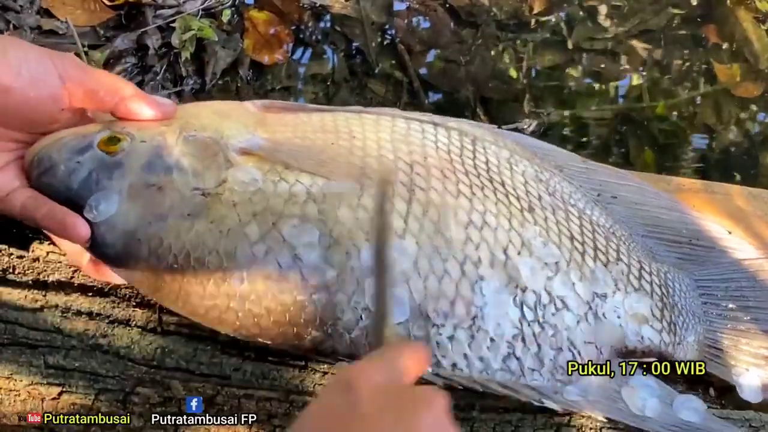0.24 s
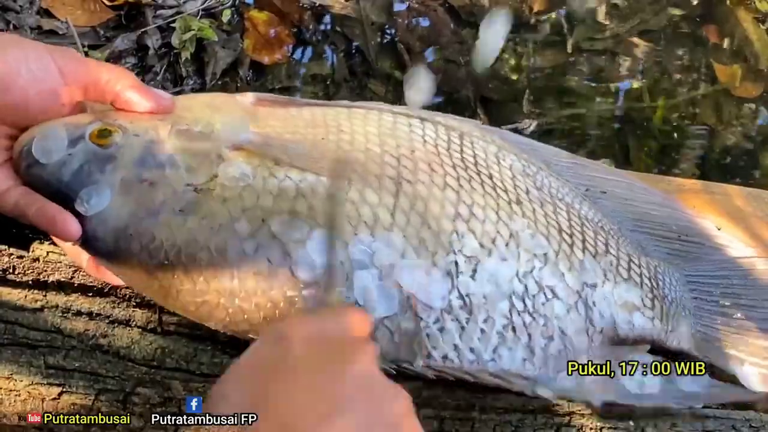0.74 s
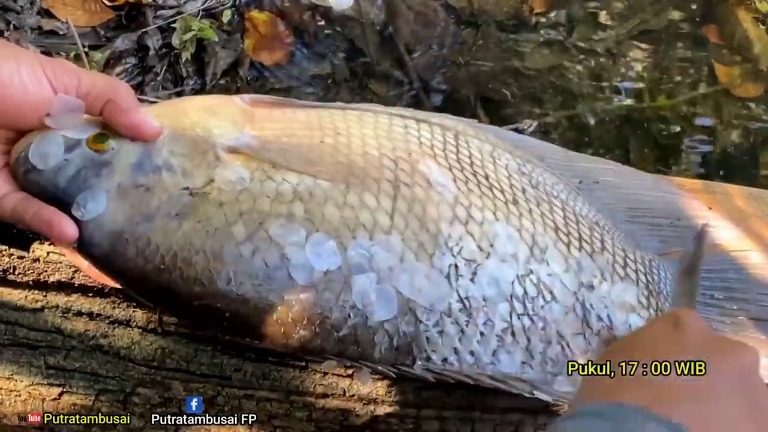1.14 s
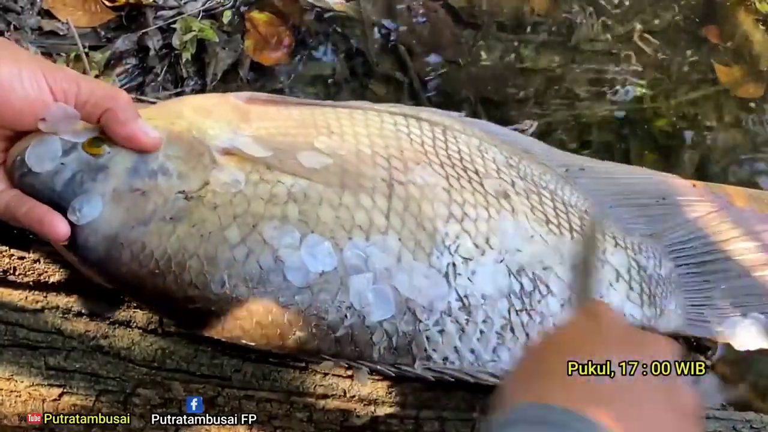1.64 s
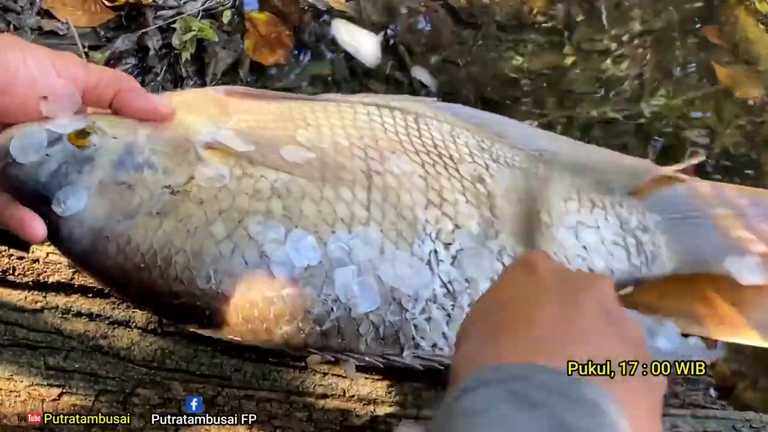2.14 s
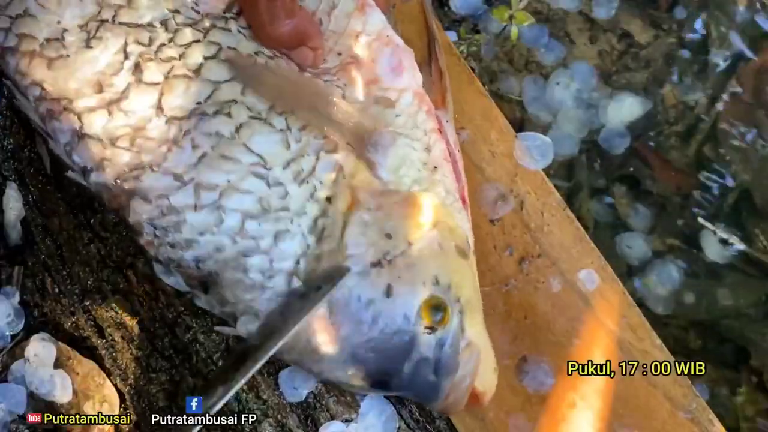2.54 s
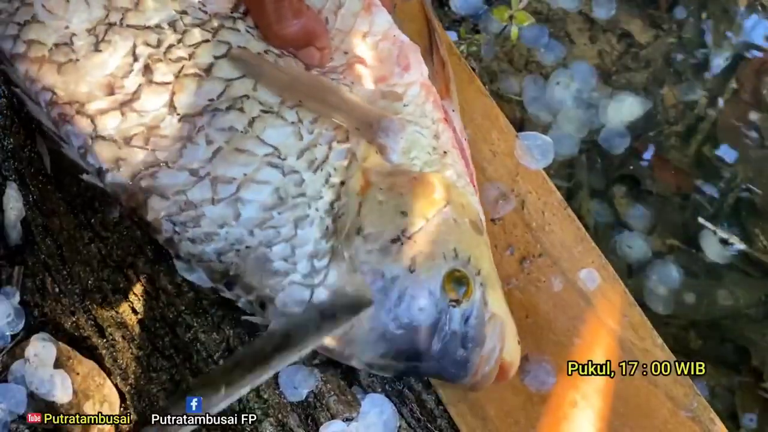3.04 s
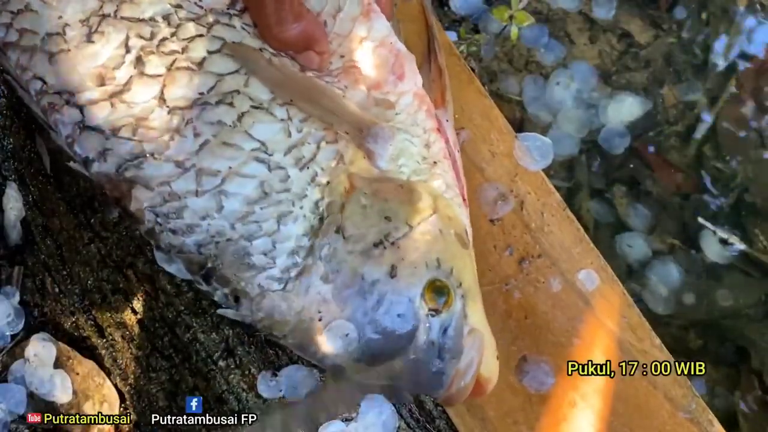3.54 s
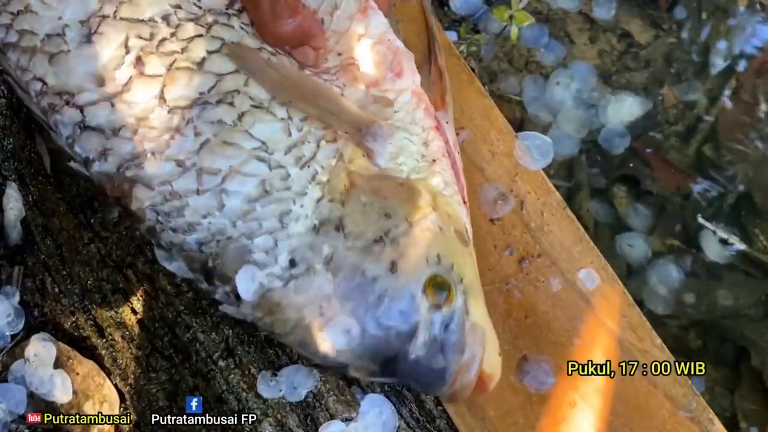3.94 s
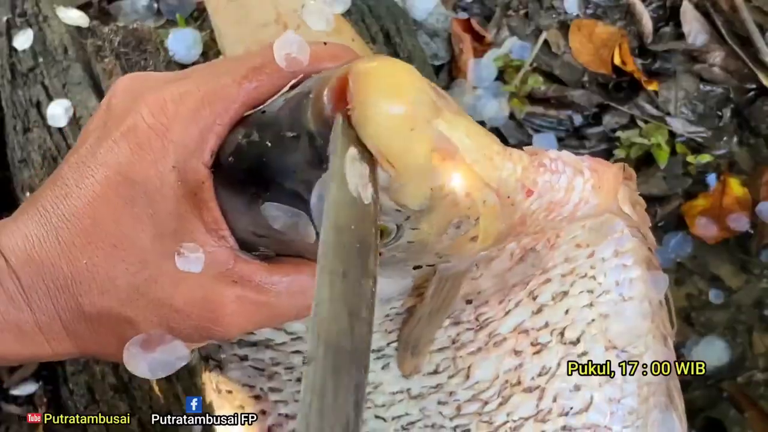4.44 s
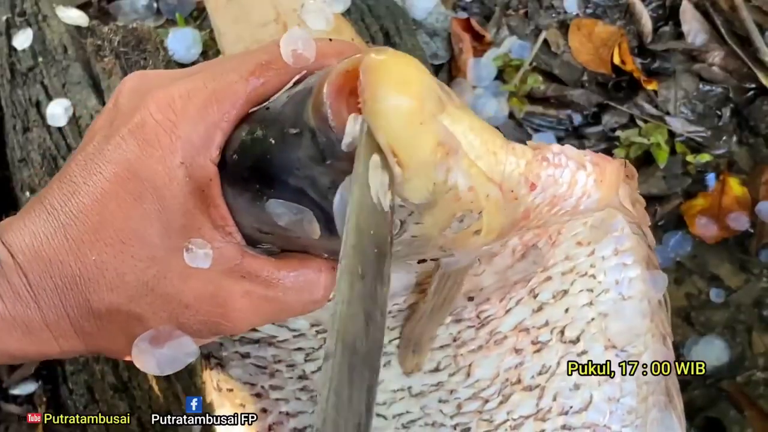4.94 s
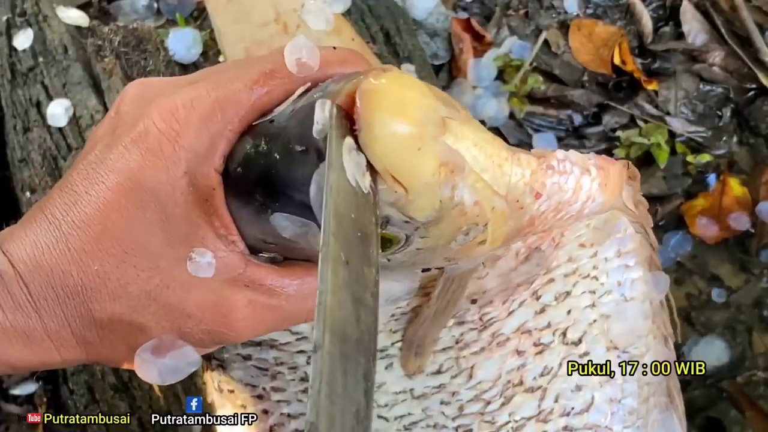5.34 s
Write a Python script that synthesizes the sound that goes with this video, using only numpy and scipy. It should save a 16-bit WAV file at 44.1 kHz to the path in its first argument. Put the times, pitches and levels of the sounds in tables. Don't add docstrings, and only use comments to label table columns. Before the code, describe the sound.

A knife rasps scales off a large fish in quick crackling strokes, ending on the bony head, beside a low rumbling river with insects.

```python
import sys
import numpy as np
from scipy import signal
from scipy.fft import rfft, irfft
from scipy.io import wavfile
from scipy.ndimage import uniform_filter1d

SR = 44100
rng = np.random.default_rng(int(sys.argv[2]) if len(sys.argv) > 2 else 0)


def to_wav(sig):
    pcm = np.clip(np.atleast_2d(sig), -1, 1) * 32767
    pcm = np.round(pcm).astype(np.int16)
    wavfile.write(sys.argv[1], SR, pcm.T)


def volts_from_db(level):
    exponent = np.asarray(level, float) / 20
    return 10 ** exponent


N = 246519


def level(x, db):
    return x * volts_from_db(db) / np.sqrt(np.mean(x ** 2))


def band(x, lo_hz, hi_hz, order=2):
    edges = [lo_hz, min(hi_hz, .45 * SR)]
    return signal.sosfilt(signal.butter(order, edges, "bandpass", fs=SR, output="sos"), x)


def colour(x, points):
    hz, db = np.transpose(points)
    log_f = np.log(np.fft.rfftfreq(N, 1 / SR) + 1)
    return irfft(rfft(x) * volts_from_db(np.interp(log_f, np.log(hz), db)), N)


def walk(rate):
    hold = int(SR / rate)
    steps = np.repeat(rng.standard_normal(N // hold + 1), hold)
    return 1.3 * uniform_filter1d(uniform_filter1d(steps, hold), hold)[:N]


def curves(tables, edge_s):
    t, out = np.arange(N) / SR, np.zeros((len(tables[0][0]), N))
    for table in tables:
        s, *columns = np.transpose(table)
        on = (t >= s[0]) & (t < s[-1])
        fade_in = (t[on] - s[0]) / edge_s[0]
        fade_out = (s[-1] - t[on]) / edge_s[1]
        out[0, on] = np.clip(np.minimum(fade_in, fade_out), 0, 1)
        out[1:, on] = [np.interp(t[on], s, c) for c in columns]
    return out


def add(out, s, sound):
    i = int(s * SR)
    out[i:i + len(sound)] += sound[:N - i]


def squelch(knife):
    depth_db, time_s = -10.5, 0.11
    n = np.arange(N)
    last_loud = np.maximum.accumulate(n * (np.abs(knife) > volts_from_db(-42)))
    since_s = (n - last_loud) / SR
    return volts_from_db(uniform_filter1d(depth_db * (1 - np.exp(-(since_s / time_s) ** 2)), size=400))


# (frequency [Hz], density [dB per Hz])
RIVER_SPECTRUM = [(25, -46.5), (50, -5), (100, -8.5), (240, -12.5), (400, -25.5), (1300, -40.5),
                  (2200, -37), (6000, -39.5), (11000, -38.5), (15200, -42.5), (16000, -64)]
# (time [s], level [dB])
WATER_HISS = [(0, 5), (2.5, -1), (2.75, 7.5), (3.25, 4), (3.45, 1), (3.9, 2.5), (4.601, 5.5)]
# (time [s], level [dB])
INSECT_SWELL = [(0, -68.5), (2.199, -65.5), (4.2, -62), (4.4, -57), (5.59, -56)]


def riverside(let_through):
    t = np.arange(N) / SR
    water = colour(rng.standard_normal(N), RIVER_SPECTRUM)
    rumble = band(water, 20, 450, order=1) * np.sqrt(let_through)
    rumble = rumble * volts_from_db(3 * walk(12) + 1.2 * walk(3))
    wash_db = 4 + 1.2 * walk(2.8) + np.interp(t, *np.transpose(WATER_HISS))
    wash = band(water, 490, 16500, order=1) * let_through * volts_from_db(wash_db)
    insects = level(band(rng.standard_normal(N), 7880, 9500, order=3), -1.4) * volts_from_db(1.2 * walk(27))
    return level(rumble + wash, -54.5) + insects * volts_from_db(np.interp(t, *np.transpose(INSECT_SWELL)))


# (time [s], pitch [Hz], level [dB])
BIRD_WHISTLES = [
    [(.952, 4000, -58), (.975, 4300, -52), (.992, 4600, -54), (1.005, 5050, -52), (1.03, 5150, -53)],
    [(1.41, 5400, -58), (1.455, 5250, -59), (1.475, 4450, -58), (1.5, 4330, -53), (1.52, 4380, -64),
     (1.545, 4400, -62), (1.575, 4420, -70)],
    [(2.803, 1600, -53), (2.82, 2050, -54), (2.855, 2400, -52)],
    [(2.6, 5400, -64), (2.625, 5200, -62)],
    [(2.935, 1750, -66), (2.95, 1950, -62), (2.965, 2150, -58), (2.975, 1800, -64), (3.0, 1650, -58)],
    [(3.025, 3100, -66), (3.05, 3200, -63)],
    [(3.21, 2000, -66), (3.235, 1900, -66)],
    [(4.61, 4600, -68), (4.65, 4600, -70)],
    [(4.74, 3500, -72), (4.765, 3300, -72)],
    [(4.77, 2710, -70), (4.86, 2740, -59), (4.915, 2800, -55), (4.935, 2900, -62), (4.96, 2800, -66),
     (5.025, 2850, -68)],
    [(5.027, 2800, -61), (5.04, 2250, -63), (5.055, 1950, -67), (5.1, 1800, -73)],
]


def birds():
    on, hz, db = curves(BIRD_WHISTLES, (.01, .015))
    tremble = 1 + .004 * walk(90) + .008 * walk(400)
    phase = 2 * np.pi * np.cumsum(hz * tremble) / SR
    tone = np.sin(phase) * np.sqrt(2) * on * volts_from_db(db + 2.5 * walk(90))
    t = np.arange(6000) / SR
    trees = rng.standard_normal(len(t)) * np.exp(-np.log(1000) * t / .25)
    return volts_from_db(-4) * tone + volts_from_db(-37) * signal.fftconvolve(tone, trees)[:N]


# (frequency [Hz], rms level [dB])
WING_HARMONICS = [(590, -70), (890, -83), (1175, -81), (1490, -77), (1790, -78)]
# (time [s], level [dB])
FLY_PASSAGE = [
    (0, 2),
    (.45, 3),
    (.75, 2.5),
    (1.1, -11.5),
    (1.9, -50),
]


def fly():
    t = np.arange(N) / SR
    clock = np.cumsum(1 + .008 * walk(10) + .032 * walk(200)) / SR
    hum = sum(volts_from_db(db + 4.5 * walk(30)) * np.sin(2 * np.pi * hz * clock) for hz, db in WING_HARMONICS)
    return np.sqrt(2) * hum * volts_from_db(np.interp(t, *np.transpose(FLY_PASSAGE)))


# (time [s], peak level [dB], pitch [Hz])
FLESH_THUDS = [(.2, -31.5, 201), (.274, -32.5, 459), (.49, -32, 146), (.62, -36.5, 336), (.784, -13, 1845),
               (.83, -30.5, 197), (1.024, -22.5, 198), (1.091, -29.5, 262), (1.162, -35, 840),
               (1.306, -25.5, 220), (1.325, -24.5, 230), (1.338, -27, 215), (1.396, -26.5, 260),
               (1.377, -22.5, 233), (1.578, -9.5, 500), (1.666, -22, 266), (1.874, -26.5, 263),
               (1.964, -22, 240), (2.168, -19.5, 308), (2.275, -25, 193), (2.402, -24, 538),
               (2.444, -23, 419), (2.858, -26.5, 544), (3.072, -20, 528), (3.106, -18.5, 965),
               (3.3, -20.5, 606), (3.339, -17, 1016), (3.372, -31.5, 248), (3.557, -22, 516),
               (3.599, -16, 382), (3.815, -31, 360), (.876, -42, 810), (2.315, -31.5, 254),
               (2.832, -43, 300), (1.685, -26, 240), (2.196, -30, 300), (1.6, -28, 330), (1.045, -28, 200)]


def thuds():
    out, t = np.zeros(N), np.arange(4000) / SR
    for s, db, hz in FLESH_THUDS:
        noise = rng.standard_normal(len(t))
        sink = .75 + 1.9 * min(hz / 500, 1) ** 1.5 * np.exp(-t / .003)
        pitch = hz * sink * (1 + .8 * uniform_filter1d(noise, size=120))
        wave = np.sin(2 * np.pi * np.cumsum(pitch) / SR) + 2.8 * band(noise, hz / 2, hz * 1.8)
        t60_s = 0.045 * (400 / hz) ** 0.4
        shape = (1 - np.exp(-t / .0012)) * np.exp(-np.log(1000) * t / t60_s)
        add(out, s + .002, volts_from_db(db) * wave * shape)
    return out


# (time [s], peak level [dB], lowest mode [Hz])
BONE_KNOCKS = [(2.63, -29, 644), (2.665, -36, 1170), (3.415, -47, 850), (3.75, -33.5, 550),
               (3.794, -24.5, 510), (4.018, -27, 557), (4.034, -23.5, 589), (4.049, -25, 556),
               (4.259, -18, 525), (4.275, -14, 540), (4.479, -26, 525), (4.494, -21, 917),
               (4.5, -16.5, 610), (4.69, -36.5, 444), (4.826, -49, 1804), (4.843, -43, 1780),
               (4.974, -38, 1776)]
# (multiple of the lowest [ratio], level [dB])
SKULL_MODES = [(1, 5), (1.7, -4.5), (2.3, -7), (3.6, -9)]


def knocks():
    t60_s, rise_s = 0.029, 0.0019
    out, t = np.zeros(N), np.arange(3000) / SR
    shape = (1 - np.exp(-(t / rise_s) ** 2)) * np.exp(-np.log(1000) * t / t60_s)
    for s, db, hz in BONE_KNOCKS:
        noise = rng.standard_normal(len(t))
        modes = np.zeros(len(t))
        for k, (multiple, mode_db) in enumerate(SKULL_MODES):
            phase = 2 * np.pi * hz * multiple * t + 3 * noise[k + 8]
            modes += volts_from_db(mode_db + 2 * noise[k]) * np.sin(phase)
        push = band(noise, hz * 0.84, hz * 2.96)
        add(out, s, volts_from_db(db) * shape * (0.93 * modes + 1.77 * push))
    return out


# (landing [s], lifting [s], drag on landing [dB], drag on lifting [dB], flesh re rasp [dB])
KNIFE_STROKES = [(0, 0.133, -36.5, -55, -10), (0.193, 0.392, -33, -58, -19),
                 (0.474, 0.662, -48, -44.5, -17.5), (0.759, 0.97, -38, -55.5, -11.5),
                 (1.021, 1.224, -34, -73, -15), (1.3, 1.483, -44, -60, -14),
                 (1.576, 1.791, -28.5, -56.5, -14), (1.868, 2.09, -31, -49.5, -16.5),
                 (2.163, 2.385, -31.5, -50, -12.5), (2.396, 2.586, -25.5, -48, -16.5),
                 (2.62, 2.817, -48.5, -60, -15), (2.844, 3.019, -34.5, -57, -13),
                 (3.03, 3.247, -56, -43.5, -13.5), (3.291, 3.406, -39, -65, -13.5),
                 (3.527, 3.644, -39.5, -68, -5), (3.75, 3.86, -39.5, -75, -11),
                 (3.997, 4.108, -49.5, -70, -8), (4.241, 4.312, -49.5, -65.5, -12),
                 (4.465, 4.619, -49.5, -75, -12), (4.684, 4.743, -44.5, -57, -18.5),
                 (5.284, 5.426, -38, -53.5, -28), (5.517, 5.571, -50.5, -34, -28)]
# (time [s], peak level [dB], build-up per 20 dB [ms], release per 20 dB [ms])
SCALE_CATCHES = [(0.254, -22, 30, 19), (.319, -40.5, 44, 21), (0.533, -25.5, 43, 47), (0.787, -28, 54, 15),
                 (.834, -32.5, 15, 15), (1.07, -31.5, 67, 58), (1.1, -29.5, 79, 25), (1.16, -46.5, 75, 45),
                 (1.331, -25.5, 29, 46), (1.385, -31.5, 36, 58), (1.674, -27.5, 104, 26),
                 (1.914, -25.5, 15, 13.6), (1.977, -20, 16, 19), (2.213, -19, 18, 14), (2.277, -26, 13, 33),
                 (2.631, -20, 2.9, 45.5), (2.749, -33.5, 76, 24), (2.861, -26.5, 49, 28),
                 (2.991, -47.5, 33, 28), (3.073, -20, 14.3, 18.5), (3.113, -17.5, 24.5, 14.7),
                 (3.318, -20, 21, 22), (3.565, -32, 18, 40), (3.797, -22, 4.3, 33), (4.05, -28, 43, 20),
                 (4.265, -20, 12.8, 26.5), (4.501, -25, 50, 16.5), (4.721, -32, 65, 14),
                 (5.345, -27.5, 84, 25), (5.402, -40, 54, 15)]


def pressure():
    t = np.arange(N) / SR
    strokes = [[(a, d0, f), (b, d1, f)] for a, b, d0, d1, f in KNIFE_STROKES]
    on, drag_db, flesh_db = curves(strokes, (0.004, 0.03))
    gain = volts_from_db(drag_db)
    for s, db, build_ms, release_ms in SCALE_CATCHES:
        i = slice(max(int((s - .3) * SR), 0), int((s + .3) * SR))
        slope_ms = np.where(t[i] < s, build_ms, release_ms)
        gain[i] += volts_from_db(db - 20 * 1000 * np.abs(t[i] - s) / slope_ms)
    return on * gain, on * gain * volts_from_db(flesh_db)


# (frequency [Hz], density [dB per Hz])
RASP_SPECTRUM = [(600, -8), (1100, 3), (2000, 12.5), (4400, 18.5), (7500, 18.5), (9000, 14), (11000, 9.5),
                 (14000, 12.5), (15800, -5.5), (16500, -49.5)]


def rasp(gain, push):
    slip_db = 1.1 * np.minimum(rng.exponential(size=N), 5)
    slips = (rng.random(N) < .25) * rng.standard_normal(N) * volts_from_db(slip_db)
    scales = level(colour(slips, RASP_SPECTRUM), -0.44)
    dull = band(scales, 630, 4400) * volts_from_db(3.28 * walk(200))
    bright = band(scales, 7100, 16500) * volts_from_db(3.73 * walk(200))
    middle = band(scales, 4730, 6860) * volts_from_db(-2 + 3.8 * walk(150))
    edge = gain * volts_from_db(2 * walk(60)) * (dull + middle + bright)
    flesh = level(band(slips, 210, 1150), -1.27) * volts_from_db(4 * walk(40.09)) * push
    sway = signal.lfilter([1 / 900], [1, 1 / 900 - 1], push)
    rocking = level(band(rng.standard_normal(N), 36, 182), 0.2) * sway
    return edge, flesh + rocking


def small_scales(gain, count=200):
    when, size, pitch = rng.random((count, 3)).T
    when = .01 + when * (N / SR - .05)
    press_db = 20 * np.log10(gain[(when * SR).astype(int)] + 1e-6)
    db = press_db + 3 - 2 * np.log(size + 0.033)
    hz = 5600 * 2 ** (1.1 * (pitch - .5))
    return [(s, d, f, 0.66) for s, d, f in zip(when, db, hz) if d > -60]


# (time [s], peak level [dB], pitch [Hz], length [ms])
SCALE_SNAPS = [(.072, -21.5, 2250, 1.8), (.236, -23, 6800, 0.38), (.2512, -1.5, 6200, 0.55),
               (.2747, -17.5, 2670, 2.3), (.3169, -11, 4180, 1.66), (.5062, -14.5, 4630, 0.18),
               (.5623, -16, 5530, 1.2), (.7655, -19, 8860, 1.6), (.7869, -0.5, 8140, 0.13),
               (.8323, -8, 2670, 0.54), (.9537, -20, 9800, 0.67), (1.0458, -9.5, 5300, 1.7),
               (1.0533, -10.5, 4380, 0.49), (1.08, -14, 8500, 0.85), (1.0955, -1, 3310, .9),
               (1.1509, -16.5, 2920, 1.5), (1.1627, -13, 4300, 1.5), (1.332, -14, 9200, 0.46),
               (1.3809, -3.5, 3500, 1.5), (1.3955, -12, 10100, 1.2), (1.63, -13, 8960, 1.3),
               (1.6736, -18, 3500, 0.45), (1.679, -11, 5130, 1.5), (1.709, -20.5, 3300, 0.73),
               (1.9675, 1, 3100, 0.67), (1.9707, 1.5, 4270, 0.35), (1.9816, -10.5, 3830, 1.2),
               (2.215, -12, 5660, 1.2), (2.276, -9, 8600, 0.41), (2.3176, -24, 1980, 7.3),
               (2.3982, -15.5, 9600, 1.3), (2.4034, -13.5, 3530, 1.5), (2.454, -16, 6470, 0.39),
               (2.5441, -18.5, 4020, 0.28), (2.631, -15, 7000, 0.47), (2.6343, -8, 4020, 0.31),
               (2.7433, -9, 4150, 0.22), (2.857, -9.5, 11200, 1.3), (2.9655, -24.5, 3880, 1.34),
               (3.0787, -17, 2120, 2.9), (3.1047, -8.5, 9000, 1.8), (3.1099, -7, 7200, 3.7),
               (3.3033, 0, 5330, 0.65), (3.3154, -22.5, 4430, 2.8), (3.3185, -3.5, 4580, 0.56),
               (3.3412, -1.5, 4080, 1.9), (3.441, -35.5, 9470, 1.7), (3.4574, -37, 6060, 1.2),
               (3.5593, -10.5, 6840, 1.8), (3.5632, -7.5, 7500, 2.6), (3.5737, -4, 3960, 0.96),
               (3.753, -31, 4500, .74), (3.7964, -14.5, 3180, 0.61), (3.8154, -5, 8750, 1.2),
               (4.0389, -7, 6600, 0.2), (4.054, -8.5, 7870, 2.7),
               (4.2595, -15, 5600, 0.53), (4.3995, -32, 11150, 1.8), (4.4623, -23.5, 11100, 0.76),
               (4.477, -19, 8050, 0.67), (4.496, -0.5, 10100, 0.89), (4.5459, -18.5, 9200, 0.89),
               (4.561, -9.5, 9240, 0.34), (4.5648, -13.5, 9300, 1.7), (4.699, -19, 9600, 0.59),
               (4.8282, -25.5, 10030, 0.84), (4.8437, -19.5, 11800, 1.5), (4.8601, -32, 7500, 0.42),
               (4.975, -21, 9900, 1.45), (5.098, -38.5, 4460, 1.13), (5.1267, -16, 9100, 0.66),
               (5.1322, -22, 8700, 1.4), (5.2775, -31, 10900, 1.6), (5.308, -14, 11100, 3.1),
               (5.325, -15, 11000, 1.4), (5.343, -12.5, 10500, 6.9), (5.3467, -8, 6000, 3),
               (5.4232, -22.5, 11900, 1.3), (5.5064, -34, 8700, .76), (5.524, -22.5, 12100, 1.4),
               (5.5439, -8, 11700, 0.18), (5.553, -10, 9500, 0.39), (5.5673, -29, 9000, 1.2),
               (.2095, -21.5, 4190, 2.3), (.4325, -46, 4570, .6), (0.4819, -29, 7270, 1),
               (0.519, -15.5, 4380, 2), (0.538, -19.5, 3500, 2.2), (.58, -30, 2500, 1),
               (.597, -33, 4500, 1), (.6138, -30, 4960, .8), (.634, -27.5, 5000, 2.6),
               (.658, -44, 4500, .7), (0.8155, -23, 4310, 1), (.895, -41, 3500, 1),
               (1.0306, -22, 4480, 1.1), (1.3218, -16.5, 4930, 1.2), (1.341, -23.5, 2500, 1),
               (1.667, -19.5, 1750, 1.2), (1.762, -37.5, 2210, 2), (1.777, -33, 5150, 1),
               (1.8414, -46.5, 10500, .6), (1.894, -21, 10200, 1.1), (2.077, -39, 1500, 1.1),
               (2.1265, -46, 7860, .6), (2.2002, -15.5, 10730, 1.1), (2.432, -23, 2000, 2),
               (2.7262, -22, 4600, 2), (2.732, -25, 2500, .5), (2.898, -28, 2000, 0.91),
               (2.9255, -34, 3480, .8), (2.99, -33, 5690, 2), (3.3442, -1.5, 4130, 0.44),
               (3.056, -24.5, 7720, 0.91), (3.2, -33.5, 4300, 3), (3.2454, -41.5, 5270, 0.78),
               (3.415, -44, 2010, 1), (3.484, -53, 3800, 1), (3.634, -30.5, 6030, 1),
               (3.678, -43, 1820, 1.5), (3.71, -50, 6000, 0.87), (3.768, -37, 3500, 1.1),
               (4.0168, -22, 4200, 1.1), (4.0341, -13, 7520, 0.83), (4.192, -52.5, 2280, .8),
               (4.2647, -13, 4540, 1), (4.795, -51, 5000, 1.1), (4.687, -34, 2700, 1),
               (5.227, -53, 3000, 1), (5.291, -27.5, 3430, 2), (5.358, -14, 4760, 2)]


def snaps(gain):
    rows = SCALE_SNAPS + small_scales(gain)
    out, t = np.zeros(N), np.arange(-300, 1200) / SR
    chance = rng.standard_normal((300, len(t)))
    for (s, db, hz, ms), noise in zip(rows, chance):
        crackle = noise * np.exp(np.where(t < 0, t / 0.59, -t / 1.43) / (ms / 1000))
        crack = np.sin(2 * np.pi * hz * t + 3 * noise[0]) * np.exp(-(t * hz / 1.42) ** 2)
        broad = band(crackle, 1700, 13000, order=1)
        ring = band(crackle, hz / 1.51, hz * 1.307, order=1)
        sound = volts_from_db(-3.5) * broad / np.abs(broad).max()
        sound = sound + volts_from_db(3) * ring / np.abs(ring).max() + volts_from_db(3) * crack
        add(out, s + t[0], sound * volts_from_db(db) / np.abs(sound).max())
    return out


# (frequency [Hz], width [Hz], level [dB])
BLADE_MODES = [(1860, 69, -5.5), (2670, 140, -7), (3500, 47, -3), (4380, 66, -8.5), (5420, 110, -9.5),
               (6990, 88, -3), (7810, 77, -6), (8480, 65, 2), (9300, 110, 0), (10610, 160, -0.5),
               (11800, 170, -1)]


def blade(x):
    ring = np.zeros(N)
    for hz, w, db in BLADE_MODES:
        ring += volts_from_db(db) * band(x, hz - w - 30, hz + w + 30, order=1) * np.sqrt(500 / w)
    on_bone = np.arange(N) / SR > 4.65
    return np.where(on_bone, volts_from_db(-5) * band(x, 1900, 16500) + volts_from_db(-1) * ring, x)


# (frequency [Hz], lead of the left [rad])
CHANNEL_PHASE = [(20, 0), (2300, 0), (3100, .6), (5200, .45), (5900, -.55), (6700, 0), (7800, 0), (8100, 2.1),
                 (9000, 2), (10500, .1), (11200, -.1), (13500, -3.14), (15500, -6.2)]


def spread_stereo(x):
    hz, lead = np.transpose(CHANNEL_PHASE)
    turn = np.exp(.5j * np.interp(np.fft.rfftfreq(N, 1 / SR), hz, lead))
    return np.array([irfft(rfft(x) * turn, N), irfft(rfft(x) / turn, N)])


def scene():
    gain, push = pressure()
    edge, flesh = rasp(gain, push)
    scales = snaps(gain)
    knife = blade(edge + scales) + flesh + thuds() + knocks()
    t = np.arange(8000) / SR
    scatter = rng.standard_normal(len(t)) * np.exp(-np.log(1000) * t / 0.12) * (t > .001)
    echo = signal.fftconvolve(band(knife, 630, 21000, order=1), scatter)[:N]
    near = knife + volts_from_db(-39.5) * echo + birds() + fly() + riverside(squelch(edge + scales))
    paths = rng.standard_normal(1500) * np.exp(-np.arange(1500) / 500)
    sides = volts_from_db(-34.5) * band(near, 130, 1300)
    sides = sides + volts_from_db(-38) * band(near, 2600, 16000, order=1)
    sides = sides + volts_from_db(-40.5) * band(near, 7000, 17000)
    aside = signal.fftconvolve(sides, paths)[:N]
    return spread_stereo(near) + aside * np.array([[1], [-1]])


def low_pass(x):
    return signal.sosfilt(signal.butter(12, 16810, fs=SR, output="sos"), x)


def record(dry):
    soft = band(np.tanh(.7 * dry) / .7, 30, 19000, order=4)
    dipped = soft - .7 * band(soft, 12800, 14000, order=1)
    mix = signal.sosfilt(signal.ellip(8, .2, 60, 16000, fs=SR, output="sos"), dipped)
    return low_pass(mix)


dry = scene()
out = record(dry)
to_wav(out)
```